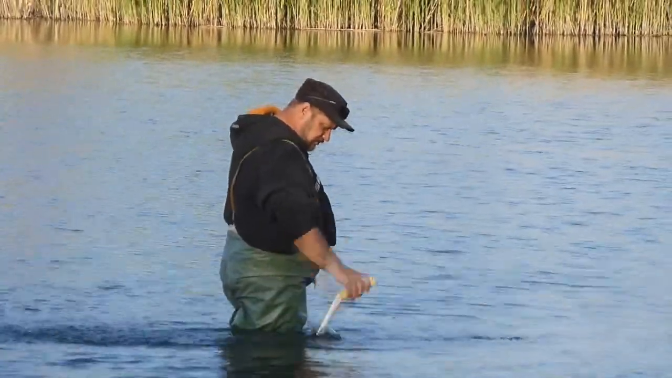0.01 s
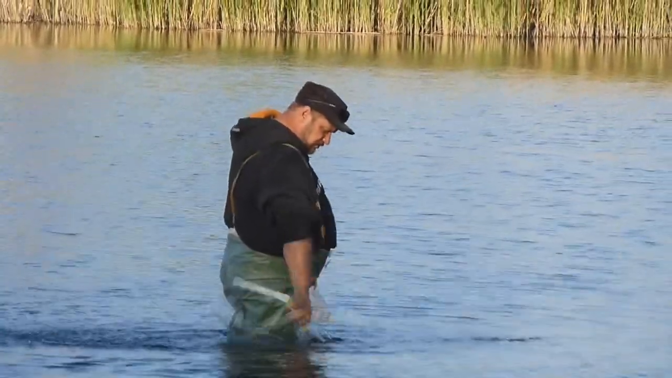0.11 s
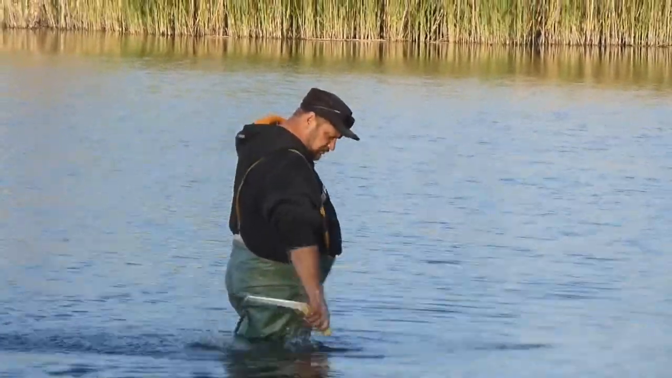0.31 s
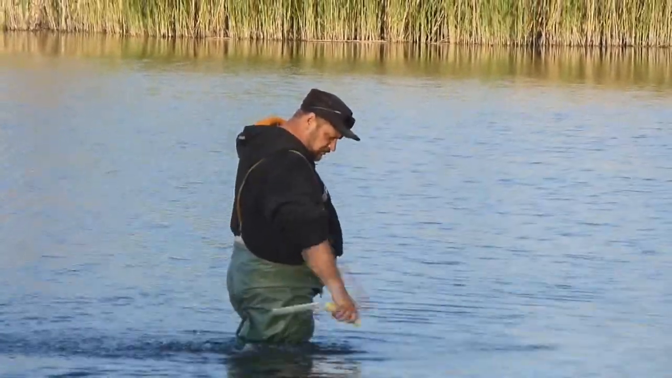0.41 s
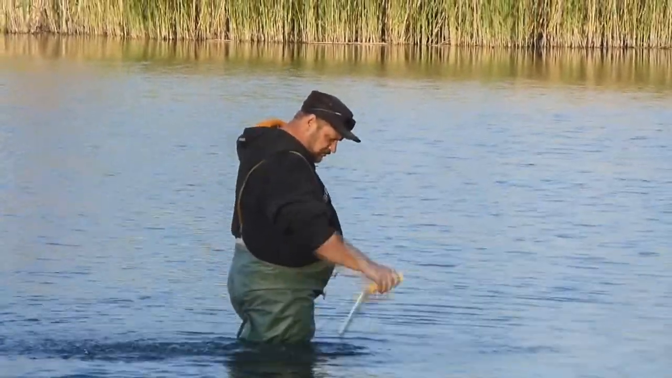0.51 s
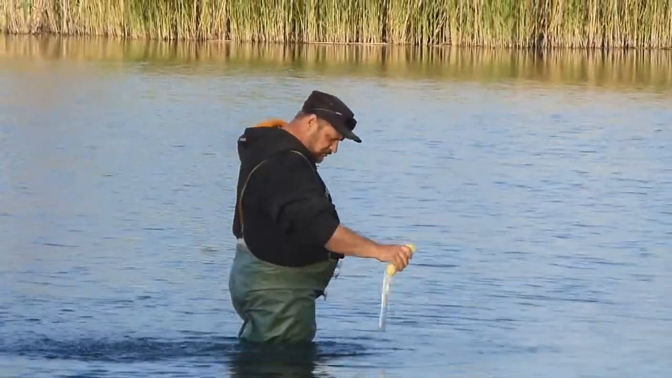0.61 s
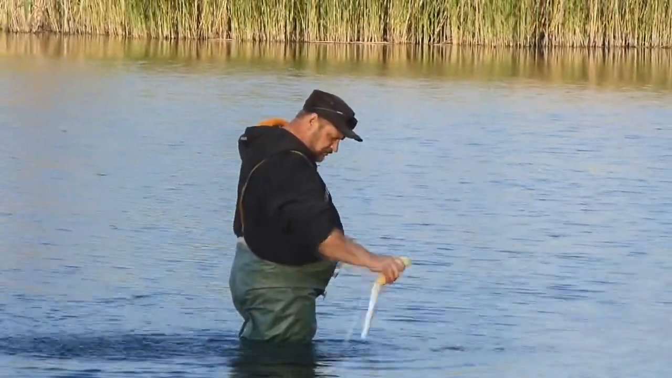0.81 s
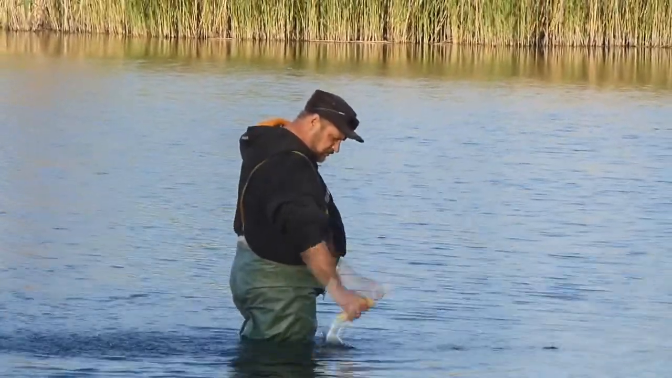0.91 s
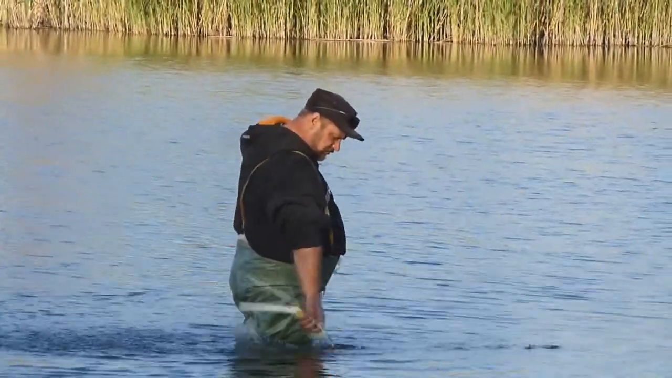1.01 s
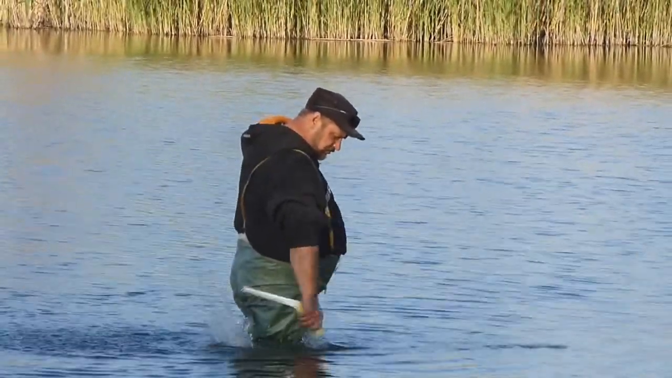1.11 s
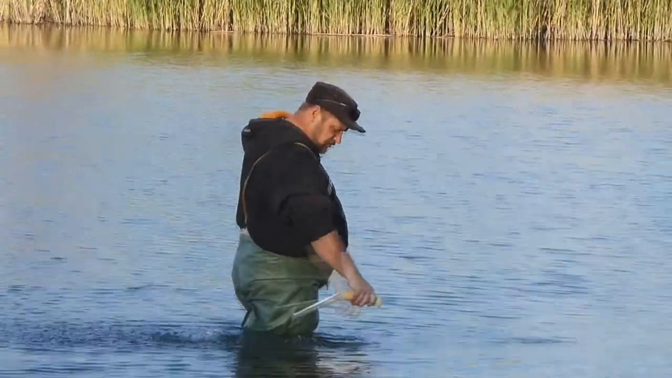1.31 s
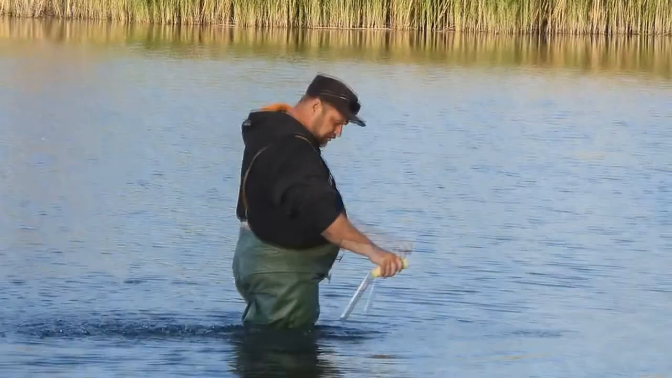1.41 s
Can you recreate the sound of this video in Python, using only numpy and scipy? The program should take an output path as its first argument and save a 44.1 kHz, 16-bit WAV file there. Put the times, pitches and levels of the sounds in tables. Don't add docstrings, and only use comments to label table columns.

```python
import sys
import numpy as np
from scipy import signal
from scipy.fft import rfft, irfft, next_fast_len
from scipy.io import wavfile
from scipy.ndimage import uniform_filter1d, map_coordinates

SR = 44100
rng = np.random.default_rng(int(sys.argv[2]) if len(sys.argv) > 2 else 0)


def bounce(signal):
    frames = np.transpose(np.atleast_2d(signal))
    limited = np.clip(frames, -1, 1)
    pcm = np.round(limited * 32767).astype(np.int16)
    wavfile.write(sys.argv[1], SR, pcm)


def volts(x):
    e = np.asarray(x, float) / 20
    return 10 ** e


N = 66150

# (time [s], level [dB], first pitch [Hz], last pitch [Hz], time to half the rise [s])
POCKETS = [
    (.2195, -5.2, 196, 532, .0127),
    (1.1158, -9.9, 139, 464, .0067),
]


def unit(x):
    return x / np.sqrt(np.mean(x ** 2) + 1e-20)


def along(points, hz):
    f, v = np.transpose(points)
    return np.interp(np.log(hz + 1), np.log(f + 1), v)


def since(s):
    return np.clip(np.arange(N) / SR - s, 0, None)


def wobble(rate):
    knots = rng.standard_normal(int(N * rate / SR) + 4)
    return map_coordinates(knots, [np.arange(N) * rate / SR])


def filtered(x, response):
    m = next_fast_len(N + 8192)
    return irfft(rfft(x, m) * response(np.fft.rfftfreq(m, 1 / SR)), m)[..., :N]


def rush(spectrum, patchy_db):
    z = signal.stft(rng.standard_normal(N), nperseg=512)[2]
    patches = uniform_filter1d(rng.standard_normal(z.shape), 5, 0)
    patches = unit(uniform_filter1d(patches, 8, 1))
    x = signal.istft(z * volts(patchy_db * patches), nperseg=512)[1][:N]
    return unit(filtered(x, lambda hz: volts(along(spectrum, hz))))


def fading(t, attack, t60):
    return (1 - np.exp(-t / attack)) * volts(-60 * t / t60)


def lake_hush():
    # (frequency [Hz], density [dB per Hz])
    hush_band = [(25, 15.5), (60, 1.5), (130, 1.1), (350, 0), (1000, -4), (4000, -13.5), (13500, -24),
                 (15700, -34)]
    hush_db = -50
    return volts(hush_db + 0.23 * wobble(4.7)) * rush(hush_band, patchy_db=1.42)


def far_chorus():
    # (time [s], level [dB])
    chorus_swells = [(0.0, -58.5), (0.284, -61), (0.66, -55), (0.798, -68.5), (1.072, -61.5), (1.224, -59),
                     (1.5, -52.5)]
    # (frequency [Hz], density [dB per Hz])
    chorus_band = [(1300, -29), (1900, -9), (2700, -2.5), (3500, -8), (4800, -33)]
    chorus_db = -4.5
    s, db = np.transpose(chorus_swells)
    level_db = np.interp(np.arange(N) / SR, s, db) + chorus_db + 1.5 * wobble(25)
    return volts(level_db) * rush(chorus_band, patchy_db=3)


def birds():
    # (time [s], length [s], first pitch [Hz], last pitch [Hz], level [dB])
    whistles = [(.158, .026, 4860, 4780, -54.5), (0.179, 0.026, 4450, 4260, -58),
                (.445, 0.031, 2810, 2660, -56), (.5, 0.07, 2760, 2720, -56), (.54, .025, 2660, 2555, -54),
                (.505, 0.18, 2013, 2070, -61.5), (.6, 0.023, 2580, 2615, -52.5),
                (.605, 0.16, 2820, 2800, -61.5), (.745, 0.048, 2200, 2170, -59),
                (1.035, .055, 2136, 2270, -56.5), (1.185, 0.031, 3250, 3320, -58.5),
                (1.232, 0.023, 2980, 2990, -54), (1.236, .04, 2140, 2740, -57),
                (1.285, 0.17, 2970, 3020, -62.5), (1.315, .03, 3120, 2980, -53),
                (1.39, 0.018, 2460, 2507, -62), (1.418, 0.0564, 2720, 2520, -54.5),
                (1.44, 0.053, 3330, 3370, -59)]
    warble, flutter_db, birds_db = .004, 4, -2
    out = np.zeros(N)
    for s, length, first_hz, last_hz, db in whistles:
        u = np.clip(since(s) / length, 0, 1)
        hz = (first_hz + (last_hz - first_hz) * u) * (1 + warble * wobble(120))
        size = volts(flutter_db * wobble(150)) * np.sqrt(np.abs(np.sin(np.pi * u))) * (u < 1)
        size = unit(size) * np.sqrt(length * SR / N)
        out += volts(db + birds_db) * size * np.sin(2 * np.pi * np.cumsum(hz) / SR)
    return out


def spray():
    # (time [s], level [dB], rise [s], t60 [s], brightness [dB per octave])
    bursts = [(0.208, -31.5, 0.0032, 0.081, -7), (.2192, -28.5, .0015, .045, -7.5),
              (0.225, -42.5, 0.0092, 0.25, -6.5), (1.0945, -32.5, .004, .07, -6),
              (1.098, -35.5, .001, 0.027, -5), (1.1112, -31, 0.0016, 0.049, -2),
              (1.115, -34, .004, 0.066, -6.5), (1.123, -40.5, 0.0048, .2, -4.5),
              (1.135, -44, .001, .03, -2), (0.459, -49.5, 0.0035, 0.097, -3), (.858, -51, .014, .14, 12),
              (1.279, -47, 0.0074, 0.088, -1), (1.405, -53, 0.0076, 0.23, -2),
              (.52, -57.5, 0.028, 0.78, -2.6), (1.16, -50.5, 0.053, 0.46, -3)]
    # (frequency [Hz], density [dB per Hz])
    spray_band = [(150, -51.5), (450, -3.5), (1000, 1), (2500, 5), (5500, 0), (10000, -6), (15500, -14)]
    crackle_db = 2
    out = np.zeros(N)
    for s, db, rise, t60, tilt_db in bursts:
        drops = rng.standard_normal(N) * volts(crackle_db * wobble(700))
        drops = filtered(drops, lambda hz: volts(along(spray_band, hz) + tilt_db * np.log2((hz + 1) / 2000)))
        size = fading(since(s), rise, t60)
        out += volts(db) * unit(size * drops) * np.sqrt(np.mean(size ** 2))
    return out


def slap():
    # (time [s], knock level [dB], push level [dB], push pitch [Hz])
    slaps = [
        (.2098, -22, -28, 111.1),
        (1.0973, -27.5, -20, 91.4),
    ]
    # (frequency [Hz], level [dB], t60 [s])
    wood = [(665, 0, 0.022), (1700, -9, 0.016), (2373, -16, 0.02), (3410, -21, .014), (4550, -20, .014)]
    scatter_db, push_t60_s = 2, 0.04
    out = np.zeros(N)
    for s, knock_db, push_db, push_hz in slaps:
        t = since(s)
        knock = np.zeros(N)
        for hz, db, t60 in wood:
            mode_gain = volts(db + rng.normal(0, scatter_db))
            knock += mode_gain * fading(t, 0.00049, t60) * np.sin(2 * np.pi * hz * t)
        push = fading(t, 0.00083, push_t60_s) * np.cos(2 * np.pi * push_hz * t)
        out += volts(knock_db) * knock + volts(push_db) * push
    return out


def pocket():
    swell_s, swell_wide_s, open_s = 0.0051, 0.0024, 0.0008
    ring_share, ring_s = 0.49, 0.016
    burst_s, burst_db = .0224, -8.5
    out = np.zeros(N)
    for s, db, low_hz, high_hz, half in POCKETS:
        t = since(s)
        turns = high_hz * t - (high_hz - low_hz) * half * np.arctan(t / half)
        swell = np.exp(-.5 * ((t - swell_s) / swell_wide_s) ** 2)
        broken = np.clip((t - burst_s) / 0.0033, 0, 1)
        ring = ring_share * np.exp(-t / ring_s) * volts(burst_db * broken)
        out += volts(db) * (swell + ring) * (1 - np.exp(-t / open_s)) * np.sin(2 * np.pi * turns)
    return out


def bubbles():
    small_tones = [(.22, -23.5, 1003, 0.03), (.2195, -28, 3300, 0.016), (.243, -35, 720, 0.042),
                   (.262, -39.5, 574, 0.088), (.282, -39.5, 594, 0.041), (1.1135, -25, 620, 0.046),
                   (1.279, -43.5, 680, 0.084), (1.282, -39.5, 796, 0.031), (1.289, -49, 966, 0.04),
                   (1.293, -46, 1170, 0.043), (1.445, -48.5, 717, 0.12), (1.45, -52.5, 1120, 0.072)]
    rise_per_s, attack_s = 1.5, 0.00061
    out = np.zeros(N)
    for s, db, hz, t60 in small_tones:
        t = since(s)
        turns = hz * t * (1 + rise_per_s * t / 2)
        out += volts(db) * fading(t, attack_s, t60) * np.sin(2 * np.pi * turns)
    return out


def reeds(x):
    # (frequency [Hz], t60 [s])
    reed_t60 = [(120, .3), (350, 1), (700, 0.65), (3000, 0.28)]
    # (frequency [Hz], level [dB])
    reed_band = [(80, -13), (200, -5.5), (280, -11), (370, 0.5), (800, 4.5), (3000, -13)]
    delay_s = .025
    far_bank_s, far_bank_wide_s, far_bank_db = .15, .025, 5.5
    hz, t, z = signal.stft(rng.standard_normal(SR // 2), SR, nperseg=512)
    far_bank = far_bank_db * np.exp(-.5 * ((t - far_bank_s) / far_bank_wide_s) ** 2)
    tail_db = along(reed_band, hz)[:, None] - 60 * t / along(reed_t60, hz)[:, None] + far_bank
    tail = signal.istft(z * volts(tail_db), SR, nperseg=512)[1]
    low_tail = filtered(np.pad(tail, (0, N))[:N], lambda f: f < 600)
    late = np.pad(x, (round(delay_s * SR), 0))
    return signal.fftconvolve(late, tail / np.linalg.norm(low_tail) / 6)[:N]


def ducking():
    duck_db, over_db = -.95, -10.5
    recover_s = .5
    gain_db = np.zeros(N)
    for s, db, *_ in POCKETS:
        fall = 1 - np.exp(-since(s + .02) / 0.036)
        gain_db += duck_db * max(db - over_db, 0) * fall * np.exp(-since(s) / recover_s)
    return volts(gain_db)


def scene():
    near = pocket() + slap() + spray() + bubbles()
    first = np.arange(N) < N // 2
    echo = reeds(near * first) + reeds(near * ~first)
    reeds_db = -24
    far = far_chorus() + birds() + lake_hush() * ducking()
    return (near + volts(reeds_db) * echo + far)[None]


def top_cut(x):
    return signal.sosfilt(signal.butter(12, 15840, fs=SR, output="sos"), x)


def record(dry):
    whine_hz, whine_db = 15625, -83
    low_cut_hz, top_hz = 81, 15750
    whine = volts(whine_db) * np.sin(2 * np.pi * whine_hz * np.arange(N) / SR)

    def band(hz):
        return (hz < top_hz) * hz ** 4 / np.sqrt(hz ** 8 + low_cut_hz ** 8)

    return top_cut(filtered(dry + whine, band))


dry = scene()
out = record(dry)
bounce(out)
```